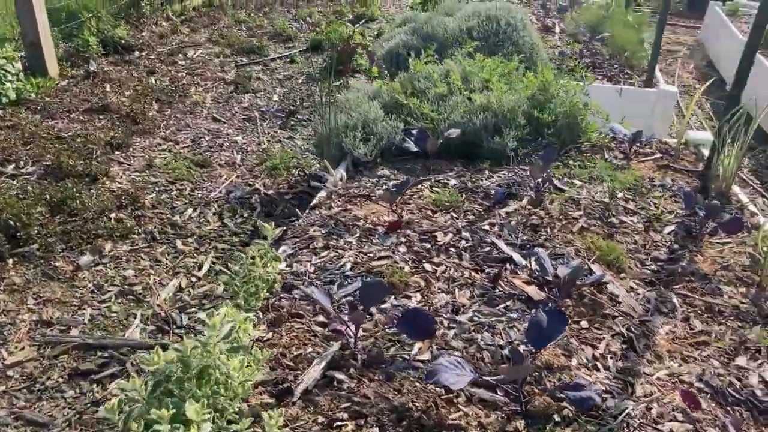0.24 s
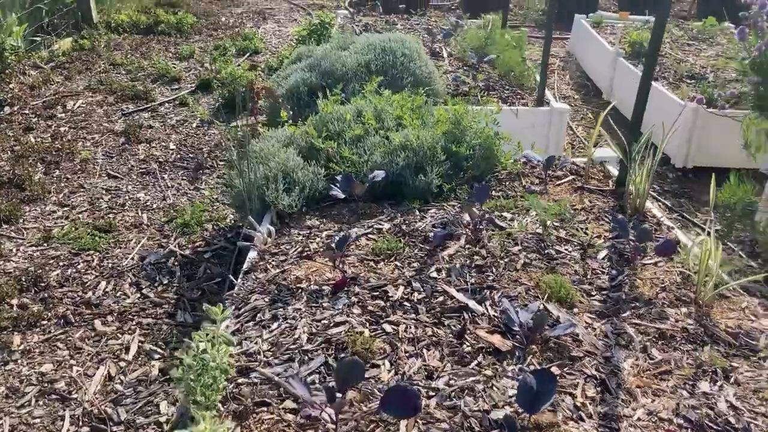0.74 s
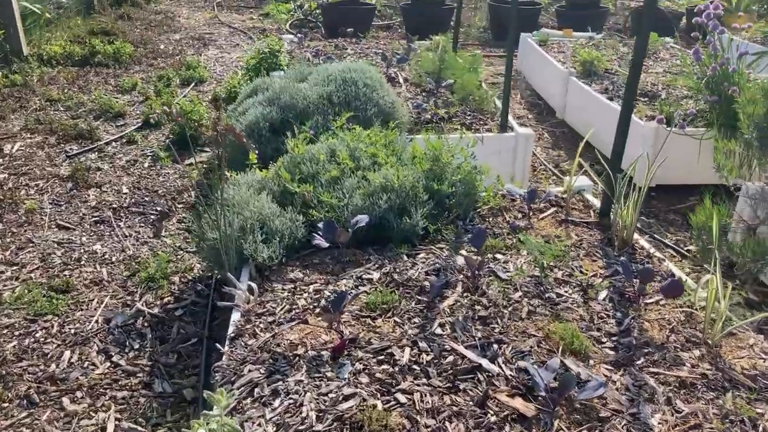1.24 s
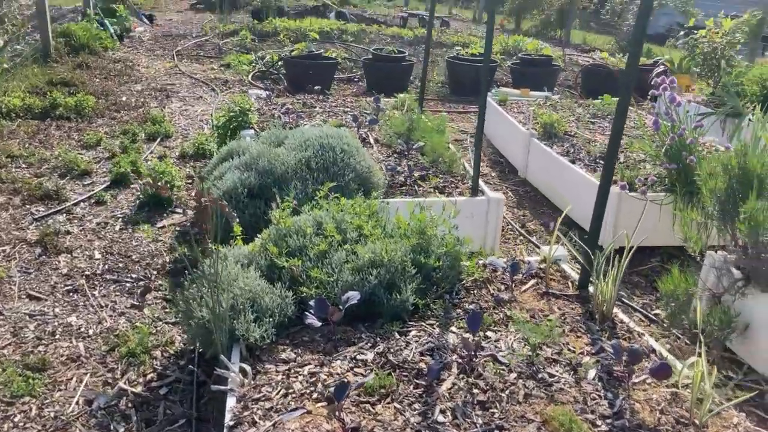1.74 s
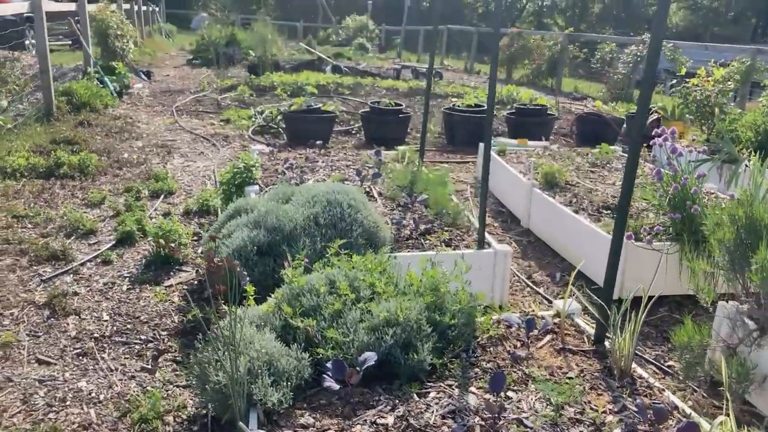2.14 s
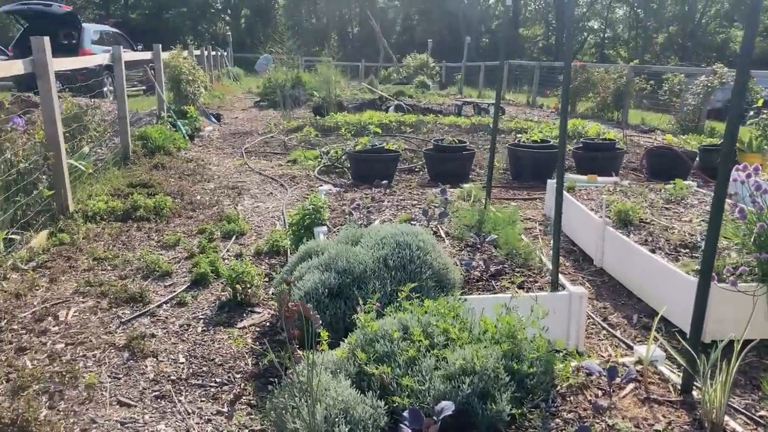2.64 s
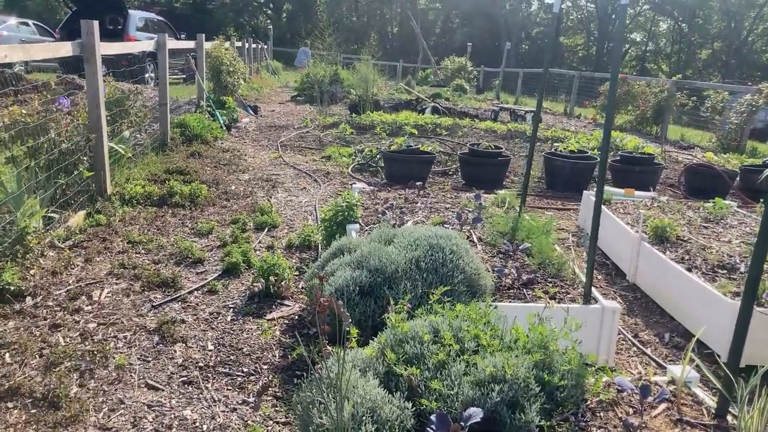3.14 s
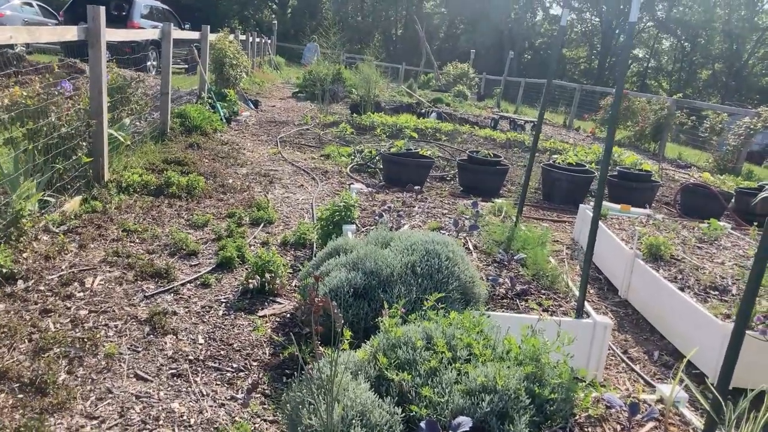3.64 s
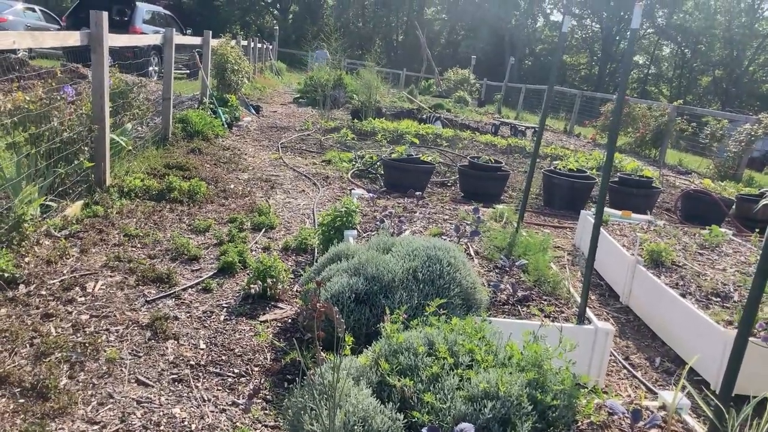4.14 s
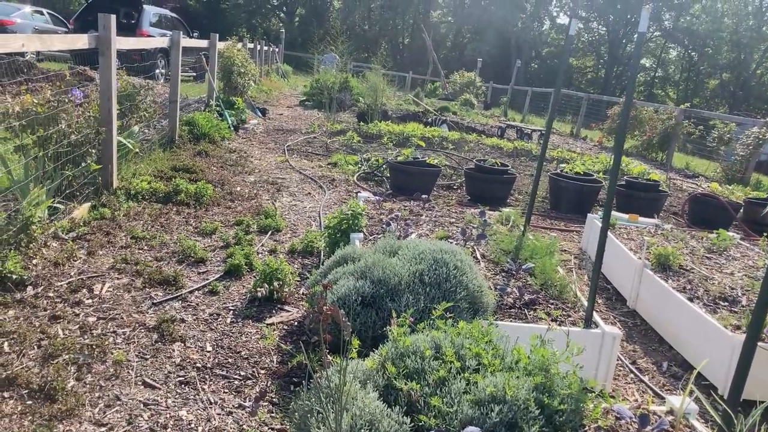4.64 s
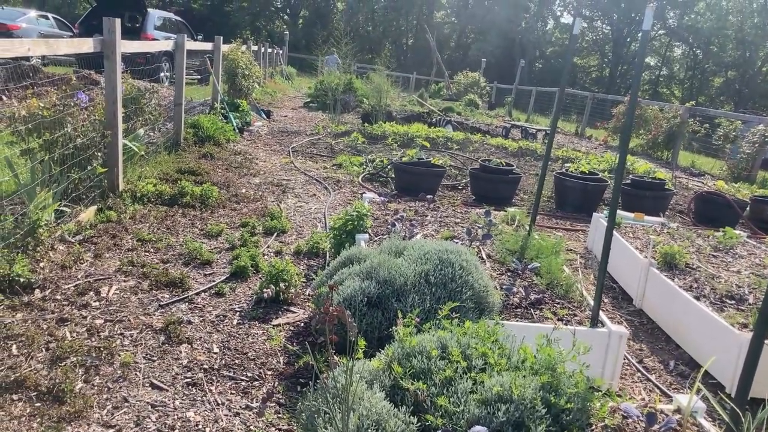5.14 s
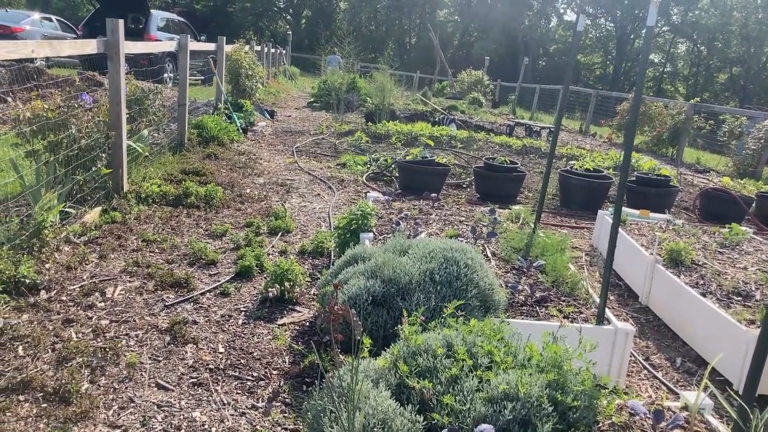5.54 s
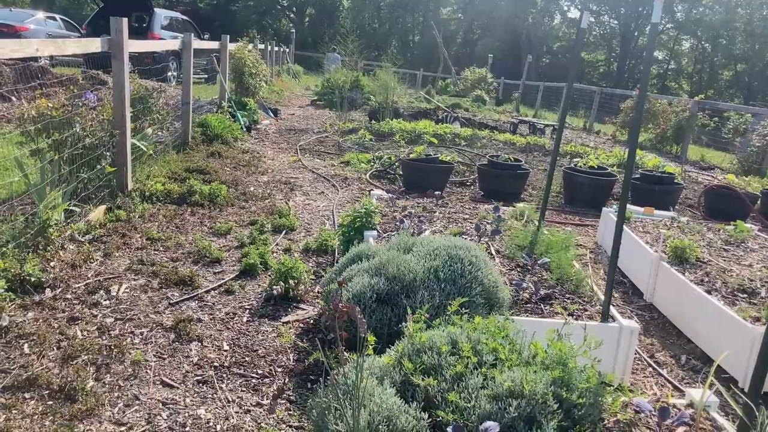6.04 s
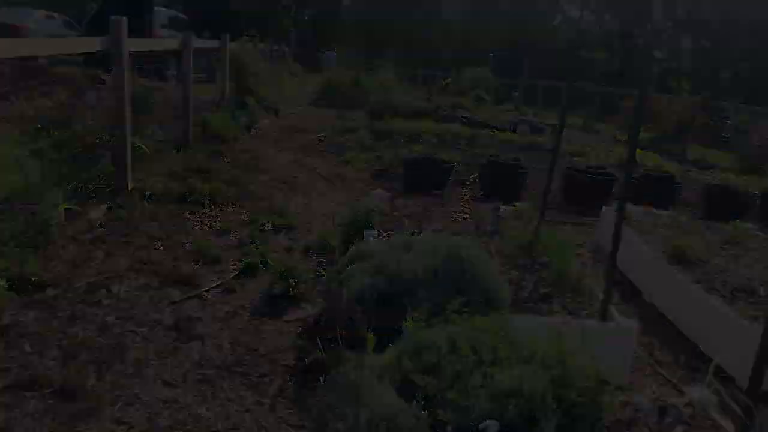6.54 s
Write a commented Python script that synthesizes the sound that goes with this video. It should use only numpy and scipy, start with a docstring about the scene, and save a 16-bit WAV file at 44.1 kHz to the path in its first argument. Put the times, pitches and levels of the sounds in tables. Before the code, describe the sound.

Close underfoot, dry wood chips crunch, snap and knock for about two and a half seconds while gusts thump the microphone. The walker then stands, with only small clicks from shifting weight. A thin songbird whistle and faint chirps emerge in the open garden over low far traffic hum and soft hiss, fading out at the end.

```python
"""A few steps crunch on a wood-chip garden path, then the walker stands and shifts weight now and then.
The crunch is clumped random clicks, some ringing, under snaps of filtered noise and damped wooden knocks.
Wind buffets the microphone as lumpy low noise. A songbird whistles in gliding sines, small birds chirp
in quick hoarse sweeps and lisp in narrow noise; coloured noise gives far traffic hum and the microphone's
own faint hiss. The level fades out at the end."""
import sys
import numpy as np
from scipy import signal
from scipy.fft import rfft, irfft, next_fast_len
from scipy.io import wavfile
from scipy.ndimage import uniform_filter1d

SR = 44100
rng = np.random.default_rng(int(sys.argv[2]) if len(sys.argv) > 2 else 0)


def transcribe(u):
    """Save the signal u as a 16-bit wav file named by the first command-line argument.

    u: samples, shape (n,) or (channels, n), limited to [-1, 1]; the rate is SR.
    q: integer samples, one column per channel.
    """
    v = np.clip(np.atleast_2d(u).T, -1, 1)
    q = np.round(v * 32767).astype(np.int16)
    wavfile.write(sys.argv[1], SR, q)


N = 298557   # samples, about 6.77 s

# A sole presses the chips. Each row: full weight at in seconds, rise in seconds, hold in seconds,
# fine rustle in dB, hollow grinding in dB.
SOLE_PRESSES = [(0, .01, 0.0014, -50.5, -40), (0.114, 0.083, 0.047, -44.5, -46.5),
                (0.259, 0.056, 0.043, -52.5, -48.5), (0.387, 0.034, 0.018, -53, -75),
                (0.53, 0.089, 0.36, -57, -90), (0.887, 0.17, 0.12, -50, -49), (1.1, 0.38, 0.07, -49, -51),
                (1.549, 0.05, 0.017, -48, -40), (1.632, 0.025, 0.034, -60, -46.5),
                (1.922, 0.38, 0.16, -49.5, -49), (2.39, 0.045, .01, -61, -76),
                (5.074, 0.022, .005, -67, -56), (5.52, 0.036, 0.0045, -70, -88)]
# Colour of the fine rustle. Each row: frequency in Hz, relative density in dB per Hz.
RUSTLE_COLOUR = [(700, -44), (1500, -21), (2500, 5.5), (4200, 10.5), (5300, 6), (6800, 6.5), (8500, 8.5),
                 (11000, 7), (15500, 3.5)]
# Colour of the hollow grinding. Each row: frequency in Hz, relative density in dB per Hz.
GRIND_COLOUR = [(150, -33), (350, -8), (550, -11.5), (850, -7.5), (1200, -1), (1800, -10.5), (3000, -13.5),
                (6000, -30.5)]
# How alike left and right are underfoot. Each row: frequency in Hz, likeness from 0 to 1.
UNDERFOOT_LIKENESS = [(640, 0.52), (2500, 0.47), (4000, 0.059), (6000, 0.063), (8000, 0.99)]
RISE_DB = 33.5                                    # gained over the rise
RUSTLE_FALL_DB_S, GRIND_FALL_DB_S = 61, 270       # dB lost per second
# Every press leaves a slower dying rustle, somewhat louder after long holds:
# dB against the rustle, dB lost per second, dB per natural log of hold
SETTLE_DB, SETTLE_FALL_DB_S, SETTLE_PER_HOLD = -7, 35, 0.81
CRACKLE_DB, CRACKLE_CYCLES = -13, 12.3            # level in the rustle; cycles to fall 60 dB


def tread():
    """Thousands of tiny slips a second under the sole, arriving in clumps, with ringing chips among them."""
    s, rise, hold, rustle_db, grind_db = np.transpose(SOLE_PRESSES)
    settle_db = rustle_db + SETTLE_DB + SETTLE_PER_HOLD * np.log(hold / hold.max())
    pressing = swells(s, hold, rustle_db, RISE_DB / rise, RUSTLE_FALL_DB_S)
    settling = swells(s, hold, settle_db, RISE_DB / rise, SETTLE_FALL_DB_S)
    rustling = np.hypot(pressing, settling)
    grinding = swells(s, hold, grind_db, RISE_DB / rise, GRIND_FALL_DB_S)

    clumps = drift(40)
    density = from_db(4.0 * clumps)
    rustle = coloured(grains(8000 * density, 3.3), RUSTLE_COLOUR, UNDERFOOT_LIKENESS)
    grind = coloured(grains(1500 * density, 3.6), GRIND_COLOUR, UNDERFOOT_LIKENESS)
    rustle += from_db(CRACKLE_DB) * crackle(clumps, 2350, 11400, per_s=270, spread_db=4.0)
    # the hollow grinding holds more ringing chips
    grind += from_db(CRACKLE_DB + 9.5) * crackle(clumps, 613, 1670, per_s=350, spread_db=4.6)
    return rustling * rustle + grinding * grind


def crackle(clumps, low_hz, high_hz, per_s, spread_db):
    """Sparse slips, each ringing a few cycles at one of eight pitches, picked at random."""
    clicks = grains(per_s * from_db(3.4 * clumps), spread_db)
    dealt = rng.integers(0, 8, N)      # which of the eight pitches each click rings
    pitches = np.geomspace(low_hz, high_hz, num=8)
    mid, side = sum(ring(clicks * (dealt == k), hz, CRACKLE_CYCLES / hz) for k, hz in enumerate(pitches))
    return rms_one(np.array([mid + 0.24 * side, mid - 0.25 * side]))


def ring(clicks, hz, t60):
    """A click sets a sine ringing in a two-pole resonator that falls 60 dB in t60 seconds."""
    r, w = from_db(-60 / (t60 * SR)), 2 * np.pi * hz / SR
    return signal.lfilter([0, np.sin(w)], [1, -2 * r * np.cos(w), r * r], clicks + 1e-18)


# Dry chips snapping. Each row: start in seconds, crack peak in dB, dull part in dB against the crack.
CHIP_SNAPS = [(0.1246, -23.5, -15), (0.132, -32, -21), (0.2145, -18.5, -30), (0.2313, -29.5, -9),
              (0.2699, -26.5, -4.5), (0.2764, -36, -8), (0.2948, -36, 6), (0.763, -34, -47),
              (0.856, -29.5, -10), (0.9048, -32, -18), (0.926, -21, -19), (0.937, -40, -2),
              (0.973, -28, -17), (0.9512, -27, -21), (0.9821, -17.5, -39), (1.0127, -24.5, -25),
              (1.0252, -23.5, -20), (1.165, -33, -17), (1.2159, -23.5, -14), (1.5482, -30, -1.5),
              (1.574, -37, -2), (1.822, -44, -16), (1.8486, -34, -17), (1.966, -27, -27),
              (2.0465, -23, -21), (2.1303, -26, -37), (2.238, -45, 3), (2.393, -38, -13),
              (2.4827, -21, -36), (2.4904, -37, -25), (2.724, -46, -12), (3.052, -42, 4.5),
              (3.895, -46.5, 0), (4.141, -57.5, 16), (4.1605, -48, 9), (4.834, -48.5, 11), (5.008, -54, 8),
              (5.017, -36.5, 3.5), (5.39, -48, -32), (5.554, -36, -24), (6.672, -52, 6.5)]


def snaps():
    """A crack of noise a millisecond long in a pitch region of its own, a duller part and a splintering tail."""
    out, t = np.zeros((2, N)), np.arange(900) / SR
    dull = signal.butter(1, [1900, 5600], "band", fs=SR, output="sos")
    for s, peak_db, dull_db in CHIP_SNAPS:
        noise = rng.standard_normal((4, len(t)))
        low_hz = rng.uniform(5560, 10800)      # each crack gets a random pitch region
        bright = signal.butter(1, [low_hz, low_hz * 1.33], "band", fs=SR, output="sos")
        attack = 1 - np.exp(-t / 0.00022)
        decay = np.exp(-t / 0.00057) + 0.045 * np.exp(-t / 0.015)      # crack, then splintering tail
        crack = signal.sosfilt(bright, (noise[0] + 0.92 * noise[1:3]) * attack * decay)
        late = signal.sosfilt(dull, noise[3] * t / .001 * np.exp(1 - t / 0.00025))
        sound = crack / abs(crack).max() + from_db(dull_db) * late / abs(late).max()
        add(out, s, from_db(peak_db + np.array([[-.7], [.7]])) * sound)
    return out


# Thick chips knocking together. Each row: start in seconds, level in dB, pitch in Hz.
CHIP_KNOCKS = [(0.125, -36, 1150), (0.135, -36, 900), (0.165, -41, 700), (0.215, -33, 800),
               (0.232, -31.5, 790), (0.295, -27, 940), (0.897, -33.5, 1070), (0.938, -36, 1120),
               (0.951, -28, 1070), (0.989, -33, 804), (1.061, -30.5, 855), (1.118, -36, 990),
               (1.139, -37.5, 1100), (1.216, -36.5, 1240), (1.505, -47, 1020), (1.527, -43, 806),
               (1.551, -30.5, 940), (1.559, -28, 790), (1.572, -26, 890), (1.58, -35, 840),
               (1.611, -41, 1010), (1.629, -39, 910), (1.636, -29.5, 710), (1.667, -35.5, 785),
               (1.77, -33, 910), (1.823, -37, 975), (1.862, -41, 1050), (1.986, -35.5, 860),
               (2.037, -34, 770), (2.484, -23, 964), (2.724, -41, 960), (3.054, -39, 910),
               (4.16, -38.5, 750), (4.837, -34.5, 725), (5.018, -34.5, 670)]
KNOCK_RATIO, KNOCK_UPPER = 1.9, 1.7   # upper mode: pitch ratio, gain before its quicker decay


def knocks():
    """A heavily damped wooden ring, with a shorter upper mode, of two or three cycles in a puff of grit."""
    out, t = np.zeros((2, N)), np.arange(900) / SR
    grit = signal.butter(1, [500, 1800], "band", fs=SR, output="sos")
    swell = t / 0.00081 * np.exp(1 - t / 0.00092)
    upper_swell = KNOCK_UPPER * swell * np.exp(-t / 0.00047)
    for s, level_db, hz in CHIP_KNOCKS:
        puff = signal.sosfilt(grit, rng.standard_normal((2, len(t))) * np.exp(-t / 0.012))
        body = swell * np.sin(2 * np.pi * hz * t)
        upper = upper_swell * np.sin(2 * np.pi * KNOCK_RATIO * hz * t)
        add(out, s, from_db(level_db) * (body + upper + 0.45 * puff))
    return out


# Slowly changing wind under the gusts. Each row: time in seconds, buffeting in dB.
WIND_BACKGROUND = [(0, -33), (.5, -24), (.75, -36), (1.15, -31), (1.65, -49.5), (2.5, -65), (3.05, -64),
                   (3.9, -42), (4.4, -40.5), (5.15, -39), (5.6, -45), (6.35, -41), (6.77, -42.5)]
# Gusts on top of it. Each row: peak time in seconds, peak level in dB, length in seconds.
WIND_GUSTS = [(0.176, -20.5, 0.061), (0.249, -19, 0.049), (0.344, -17.5, 0.039), (0.637, -21, 0.035),
              (0.849, -22.5, 0.079), (0.954, -20.5, 0.064), (1.433, -25.5, 0.12), (1.74, -34.5, 0.28),
              (2.248, -31, 0.026), (2.318, -35.5, 0.06), (3.193, -32, 0.11), (3.419, -24, 0.088),
              (3.9, -37, 0.061), (4.536, -30.5, 0.054), (4.99, -26.5, 0.14), (5.234, -27, 0.1),
              (5.704, -32, 0.12), (6.107, -35, 0.13), (6.263, -30, 0.06), (6.466, -26, 0.048)]
# Sharpness of the gusts. Each row: time in seconds, upper part in dB over the buffeting.
GUST_SHARPNESS = [(0, -7), (.2, -10.5), (.5, -5.5), (.9, -12), (1.4, -13.5), (2.3, -1), (3.4, -15.5),
                  (4.3, -4.5), (5.1, -17), (6.77, -14)]
# Colour of the low buffeting. Each row: frequency in Hz, relative density in dB per Hz.
BUFFET_COLOUR = [(20, -41), (32, -2), (50, 13.5), (70, 16.5), (110, 10), (160, -5), (250, -11.5),
                 (900, -110)]
# Colour of its upper part. Each row: frequency in Hz, relative density in dB per Hz.
BUFFET_TOP_COLOUR = [(60, -55), (100, 2.5), (160, 0.5), (250, -9.5), (400, -22.5), (600, -47), (2000, -100)]
# How alike the wind is left and right. Each row: frequency in Hz, likeness from 0 to 1.
PORT_LIKENESS = [(40, 1), (130, 0.58), (300, 0.79)]
GUST_RISE_DB, GUST_FALL_DB = 26, 10   # lost one gust length before and after the peak


def wind():
    """Eddies hit the microphone ports in lumps; the upper part swells and sinks more strongly, partly on its own."""
    (background_db,), (edge_db,) = in_time(WIND_BACKGROUND), in_time(GUST_SHARPNESS)
    s, peak_db, length = np.transpose(WIND_GUSTS)
    gusting = swells(s, 0, peak_db, GUST_RISE_DB / length, GUST_FALL_DB / length)
    force = np.hypot(from_db(background_db), gusting)
    lumps = drift(45)
    low = coloured(rng.standard_normal((2, N)), BUFFET_COLOUR, PORT_LIKENESS)
    low *= from_db(2.3 * lumps)
    top = coloured(rng.standard_normal((2, N)), BUFFET_TOP_COLOUR, PORT_LIKENESS)
    top *= from_db(2.06 * lumps + 2.8 * drift(30))
    return force * (low + from_db(edge_db) * top)


# Single eddies that punch the ports. Each row: start in seconds, level in dB, pitch in Hz.
EDDY_THUMPS = [(0.336, -25, 91), (.362, -11.5, 137), (0.387, -12.5, 103), (0.874, -16, 111),
               (1.128, -23, 111), (1.424, -22.5, 112), (2.244, -27, 119), (2.306, -30.5, 104.5),
               (5.261, -28.5, 83.6)]


def thumps():
    """A pressure lump of about one cycle; the ports let the deepest part leak away."""
    out = np.zeros((2, N))
    for s, level_db, hz in EDDY_THUMPS:
        t = np.arange(round(1.6 * SR / hz)) / SR
        lump = np.hanning(len(t)) * np.sin(2 * np.pi * hz * t) ** 3      # peaked, so it reaches higher
        add(out, s, from_db(level_db + rng.normal(0, 3.0, (2, 1))) * lump)      # uneven left and right
    return signal.sosfilt(signal.butter(2, 60, "high", fs=SR, output="sos"), out + 1e-18)


# Waving motif. Each row: seconds from its start, pitch in Hz, level in dB against the motif.
WAVE_MOTIF = [(0, 3480, -10), (.03, 3136, 0), (.08, 3220, -5), (.127, 2446, 2.5), (.2, 3010, -8),
              (.23, 2930, -11)]
# Flicking motif. Each row: seconds from its start, pitch in Hz, level in dB against the motif.
FLICK_MOTIF = [(0, 2450, -5), (.046, 2690, -2), (.068, 3137, -1), (.095, 2346, 2), (.15, 2600, -3.5),
               (.203, 2440, 4.5)]
# Waves sung. Each row: start in seconds, level in dB, left over right in dB.
SUNG_WAVES = [(2.569, -54.5, 5.6)]
# Flicks sung. Each row: start in seconds, level in dB, left over right in dB.
SUNG_FLICKS = [(3.139, -50, 3.1), (3.71, -48, 4.6)]
# Held whistles that drop and end in a rising hook. Each row: drop begins in seconds, held in seconds,
# first pitch in Hz, last pitch in Hz, level in dB, sag by the drop in dB, left over right in dB, hook in dB.
HOOKED_WHISTLES = [(4.373, 0.018, 2780, 2770, -59.5, 6.5, -5, -58),
                   (4.639, 0.11, 2883, 3023, -48.5, -1, -2, -56),
                   (4.925, 0.11, 2838, 2910, -47.5, -11, -6, -58.5)]
# Plain held notes. Each row: start in seconds, length in seconds, pitch in Hz, level in dB,
# left over right in dB.
HELD_NOTES = [(4.728, 0.069, 3300, -59.5, -8), (4.3, 0.05, 2800, -56, -2)]
TRILL_AT_S, TRILL_HALF_S = 0.128, 0.024   # inside the flick
SWELL_DB, DROP_S, DROP_TO_HZ, DROP_DB = -6, .04, 2125, -7   # whistle onset, then its drop
HOOK_AFTER_S, HOOK_S, HOOK_FROM_HZ, HOOK_TO_HZ = 0.057, 0.038, 2280, 2570


def songbird():
    """A near sine that glides, slightly unsteady, and trills fast in places."""
    out, t = np.zeros((2, N)), np.arange(N) / SR
    waver, flutter = 1 + 0.0059 * drift(76), from_db(2.3 * drift(40))
    trill_amount = sum(np.exp(-((t - s - TRILL_AT_S) / TRILL_HALF_S) ** 2) for s, *_ in SUNG_FLICKS)
    trill = trill_amount * np.sin(2 * np.pi * 140 * t + 0.85 * drift(31.6))
    for pan_db, phrase in phrases():
        hz, level_db = in_time(phrase)
        hz = uniform_filter1d(hz, size=250) + 230 * trill      # rounded corners, trill depth in Hz
        gate = np.clip(np.minimum(t - phrase[0][0], phrase[-1][0] - t) / 0.0059, 0, 1)
        tone = np.sqrt(2) * np.sin(2 * np.pi * np.cumsum(hz * waver) / SR)
        out += panned(gate * flutter * from_db(level_db) * tone, np.full(N, pan_db))
    return out


def phrases():
    """Every phrase as left-right dB and rows of (s, pitch Hz, level dB)."""
    out = []
    for motif, sung in ((WAVE_MOTIF, SUNG_WAVES), (FLICK_MOTIF, SUNG_FLICKS)):
        out += [(pan_db, np.add(motif, [s, 0, db])) for s, db, pan_db in sung]
    for s, held, hz, last_hz, db, sag_db, pan_db, hook_db in HOOKED_WHISTLES:
        whistle = [(s - held, hz, db + SWELL_DB), (s - held / 2, hz, db), (s, last_hz, db + sag_db),
                   (s + DROP_S, DROP_TO_HZ, db + sag_db + DROP_DB)]
        out.append((pan_db, whistle))
        hook = s + HOOK_AFTER_S
        out.append((pan_db, [(hook, HOOK_FROM_HZ, hook_db), (hook + HOOK_S, HOOK_TO_HZ, hook_db)]))
    return out + [(pan_db, [(s, hz, db), (s + length, hz, db)]) for s, length, hz, db, pan_db in HELD_NOTES]


# Short chirps farther off. Each row: start in seconds, level in dB, start pitch in Hz, end pitch in Hz,
# length in seconds.
FAR_CHIRPS = [(2.89, -66.5, 4600, 4290, 0.041), (4.062, -64, 3880, 3110, 0.036),
              (4.088, -63, 4050, 3150, 0.044), (4.36, -65, 4640, 4240, 0.046),
              (4.567, -68, 4900, 4360, 0.022), (4.651, -64.5, 3300, 4340, 0.03),
              (4.923, -64, 3080, 4020, 0.032), (5.197, -61, 3100, 4180, 0.025),
              (5.217, -73, 4000, 4600, 0.051), (5.204, -59, 3900, 2990, 0.045),
              (5.249, -61, 4500, 2740, 0.034), (5.25, -73, 4500, 4350, 0.038),
              (5.231, -55, 4100, 3260, 0.047), (5.29, -60.5, 4250, 2680, 0.034),
              (5.268, -64, 4360, 3200, 0.025), (5.403, -68, 3600, 4440, 0.031),
              (6.042, -67, 3800, 4200, 0.035), (6.192, -68, 3620, 3970, 0.046)]


def chirps():
    """Quick sweeps made hoarse by a rough random gain."""
    out = np.zeros((2, N))
    for s, level_db, start_hz, end_hz, length in FAR_CHIRPS + chatter(count=200):
        n = round(length * SR)
        hoarse = uniform_filter1d(rng.standard_normal((2, n)), size=20) * 7.5 + 0.6
        tone = np.sin(2 * np.pi * np.cumsum(np.linspace(start_hz, end_hz, n)) / SR)
        add(out, s, from_db(level_db) * signal.windows.tukey(n, .7) * hoarse * tone)
    return out


# Fainter chirps: typical level, mean pitch, pitch spread, spread of the sweep, length
CHATTER_DB, CHATTER_HZ, CHATTER_SPREAD_HZ, CHATTER_SWEEP_HZ, CHATTER_S = -74.5, 3800, 352, 700, 0.02


def chatter(count):
    """Rows of faint chirps at random moments and pitches."""
    when = rng.uniform(0, N / SR - .1, count)
    size, pitch, sweep = rng.standard_normal((3, count))
    hz = CHATTER_HZ + CHATTER_SPREAD_HZ * pitch
    end_hz = hz + CHATTER_SWEEP_HZ * sweep
    return list(zip(when, CHATTER_DB + 1.0 * size, hz, end_hz, np.full(count, CHATTER_S)))


# High lisping notes. Each row: start in seconds, length in seconds, centre in Hz, level in dB.
LISP_NOTES = [(1.692, 0.11, 8250, -63.5), (2.255, 0.25, 7560, -67.5), (2.48, 0.24, 7550, -71.5),
              (4.373, 0.044, 7530, -63), (4.45, 0.063, 7500, -64), (4.6, 0.055, 7460, -66.5),
              (5.149, 0.039, 7600, -62), (5.197, 0.24, 7850, -65), (5.351, 0.3, 7940, -66.5),
              (5.622, 0.11, 7700, -70), (5.937, 0.11, 7500, -71), (6.412, 0.083, 7970, -70),
              (6.478, 0.089, 7860, -63.5), (6.575, 0.086, 7900, -63)]


def lisp():
    """Thin buzzy notes: noise in a narrow band with an uneven throb."""
    out, throb = np.zeros((2, N)), from_db(2 * drift(63))
    for s, length, hz, level_db in LISP_NOTES:
        n = round(length * SR)
        band = signal.butter(1, [hz - 350, hz + 350], "band", fs=SR, output="sos")
        note = rms_one(signal.sosfilt(np.vstack([band, band]), rng.standard_normal(n)))
        add(out, s, from_db(level_db) * signal.windows.tukey(n, .6) * note * np.ones((2, 1)))
    return out * throb


GARDEN_T60_S, GARDEN_DB = 0.5, -8   # time to fall 60 dB; blur against the direct sound


def garden(x):
    """Fences and trees scatter far sounds into a short dying blur."""
    t = np.arange(SR // 2) / SR
    scatter = rng.standard_normal((2, len(t))) * from_db(-60 * t / GARDEN_T60_S) * (t > .012)
    scatter /= np.sqrt(np.sum(scatter ** 2, axis=1, keepdims=True))
    return x + from_db(GARDEN_DB) * signal.fftconvolve(x, scatter, axes=1)[:, :N]


# Far traffic hum and the microphone's own faint hiss. Each row: time in seconds, level in dB.
BACKGROUND_LEVEL = [(2.7, -41.5), (5.2, -42.5), (6.5, -43.5)]
# Colour of hum and hiss. Each row: frequency in Hz, relative density in dB per Hz.
BACKGROUND_COLOUR = [(25, -20), (45, 5.5), (90, 3.5), (150, -5), (250, -6), (340, -16), (900, -13.5),
                     (1400, -14), (2450, -24), (4300, -36.5), (5400, -47.5), (6400, -47.5), (9000, -49.5),
                     (11000, -51), (15500, -53.5)]
# How alike hum and hiss are left and right. Each row: frequency in Hz, likeness from 0 to 1.
BACKGROUND_LIKENESS = [(290, 0.59), (640, 0.055), (1300, 0.67), (1800, 1), (2400, 0.18), (4500, 0.025),
                       (6500, 0.13), (9000, 1)]
FAR_LAG_S, FAR_LAG_TO_HZ = .0004, 2500   # above this pitch the phase shift stays constant


def distance():
    """Smooth hum and hiss that breathe a little; the road lies to the right, so its hum reaches the left later."""
    level_db, = in_time(BACKGROUND_LEVEL)
    left, right = coloured(rng.standard_normal((2, N)), BACKGROUND_COLOUR, BACKGROUND_LIKENESS)
    left = lagged(left, lambda hz: np.minimum(hz, FAR_LAG_TO_HZ) * FAR_LAG_S)
    return from_db(level_db + 1.0 * drift(5.0)) * np.array([left, right])


def from_db(db):
    """Decibels to gain."""
    return 10 ** (np.asarray(db) / 20)


def rms_one(x):
    """Scale to rms 1."""
    return x / np.sqrt(np.mean(x ** 2) + 1e-20)


def in_time(rows, outside=None):
    """Columns of a table, one value a sample."""
    s, *columns = np.transpose(rows)
    return [np.interp(np.arange(N) / SR, s, c, left=outside, right=outside) for c in columns]


def at_hz(points):
    """A table over log frequency, read at every FFT bin."""
    hz = np.maximum(np.fft.rfftfreq(next_fast_len(N), 1 / SR), 1)
    return np.interp(np.log(hz), np.log(np.array(points)[:, 0]), np.array(points)[:, 1])


def drift(rate):
    """Slow random wander of rms 1: noise through two equal poles, quicker for a higher rate."""
    r = np.exp(-80 * np.pi * rate / SR)      # runs at one value per 40 samples
    slow = signal.lfilter([1], [1, -2 * r, r * r], rng.standard_normal(N // 40 + 2002))[2000:]
    return np.interp(np.arange(N) / 40, np.arange(len(slow)), rms_one(slow))


def coloured(pair, spectrum, likeness):
    """Two unrelated sources become a stereo pair of given colour and likeness; rms 1."""
    mid, side = rfft(pair, next_fast_len(N)) * from_db(at_hz(spectrum))
    alike = np.clip(at_hz(likeness), -1, 1)
    both = np.sqrt(1 + alike) * mid + np.sqrt(1 - alike) * side * np.array([[1], [-1]])
    return rms_one(irfft(both, next_fast_len(N))[:, :N])


def grains(per_s, spread_db):
    """Two trains of random clicks of uneven size."""
    sizes = from_db(spread_db * np.minimum(rng.exponential(1, (2, N)), 5)) * rng.standard_normal((2, N))
    return sizes * (rng.random((2, N)) < per_s / SR)


def swells(peak_s, hold_s, peak_db, rise_db_s, fall_db_s):
    """Gain of overlapping swells: straight rise in dB, hold, straight fall; powers add."""
    t = np.arange(0, N + 64, 64)[:, None] / SR - peak_s      # one value per 64 samples
    db = peak_db + rise_db_s * np.minimum(t, 0) - fall_db_s * np.maximum(t - hold_s, 0)
    gain = np.sqrt(np.sum(from_db(2 * db), axis=1))
    return np.interp(np.arange(N) / 64, np.arange(len(t)), gain)


def lagged(x, phase_cycles):
    """Delay each FFT bin by a number of cycles."""
    size = next_fast_len(N)
    turn = np.exp(-2j * np.pi * phase_cycles(np.fft.rfftfreq(size, 1 / SR)))
    return irfft(rfft(x, size) * turn, size)[:N]


def panned(x, pan_db):
    """Mono to stereo, left over right in dB."""
    return x * from_db(np.multiply.outer([.5, -.5], pan_db)).reshape(2, -1)


def add(out, s, sound):
    """Mix a short sound in at a moment."""
    i = round(s * SR)
    out[:, i:i + sound.shape[-1]] += sound[..., :N - i]


def scene():
    """All sources, in the open air."""
    birds = garden(songbird() + chirps() + lisp())
    return wind() + thumps() + tread() + snaps() + knocks() + birds + distance()


# Fade-out of the whole scene. Each row: time in seconds, gain in dB.
FADE_OUT = [(0, -0.5), (6.45, -3.5), (6.6, -10.5), (6.77, -21)]
TREBLE_FROM_HZ, TREBLE_LAG_S = 4650, .0003
CUTOFF_HZ = 16400


def record(dry):
    """The treble reaches the right channel a fraction of a millisecond late; fade-out; the top is cut."""
    right = lagged(dry[1], lambda hz: np.maximum(hz - TREBLE_FROM_HZ, 0) * TREBLE_LAG_S)
    faded = from_db(in_time(FADE_OUT)[0]) * np.array([dry[0], right])
    return signal.sosfilt(signal.cheby2(12, 60, CUTOFF_HZ, fs=SR, output="sos"), faded)


dry = scene()
out = record(dry)
transcribe(out)
```